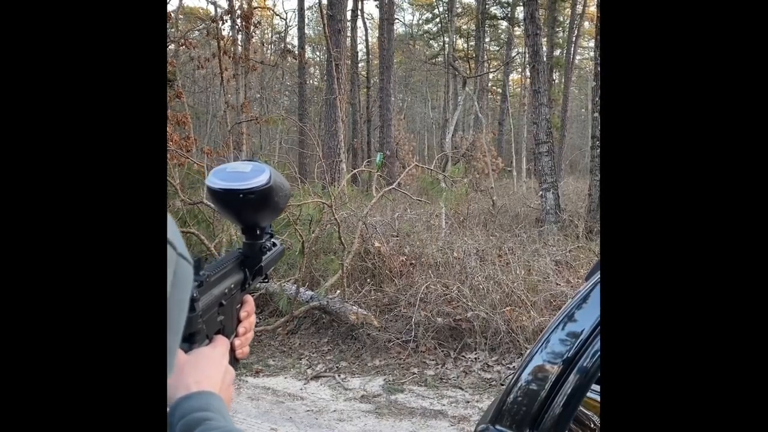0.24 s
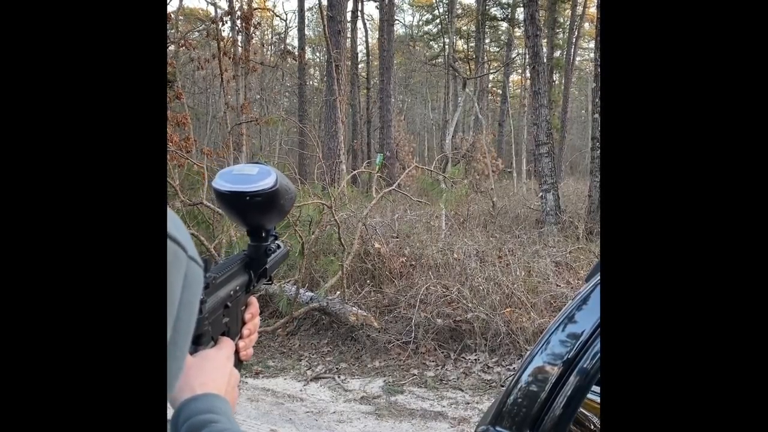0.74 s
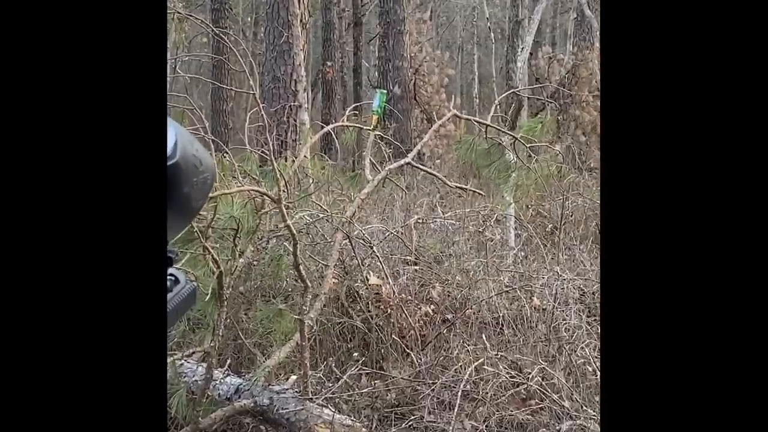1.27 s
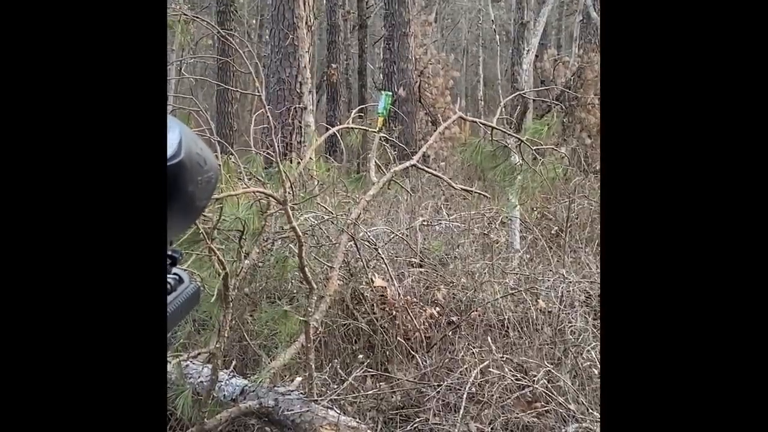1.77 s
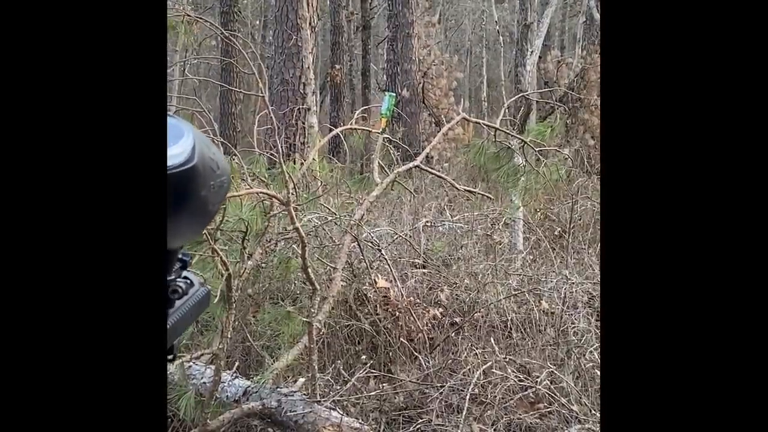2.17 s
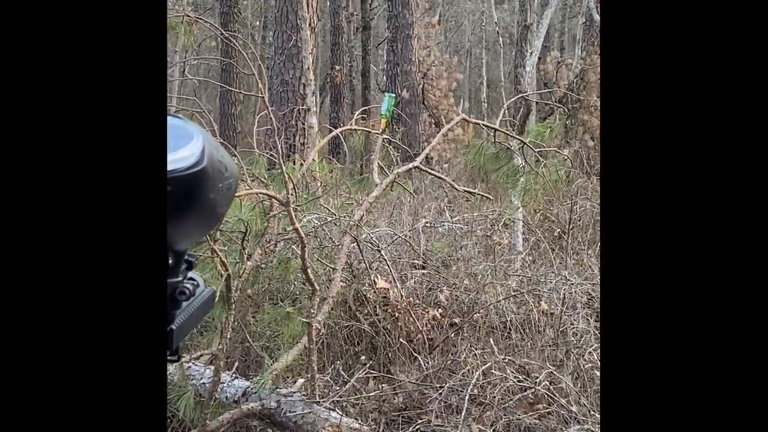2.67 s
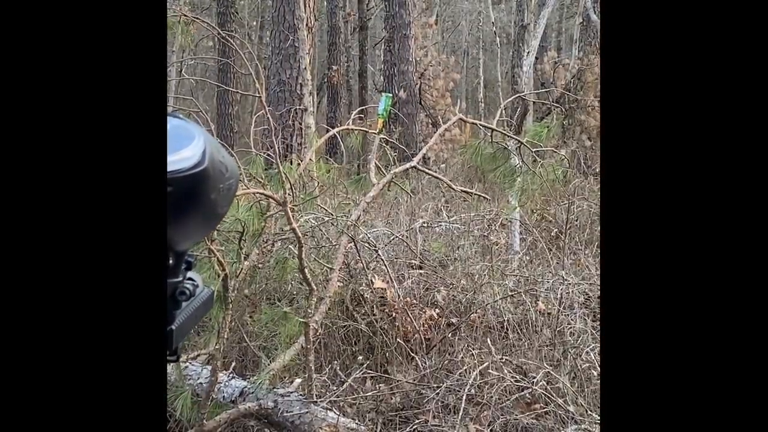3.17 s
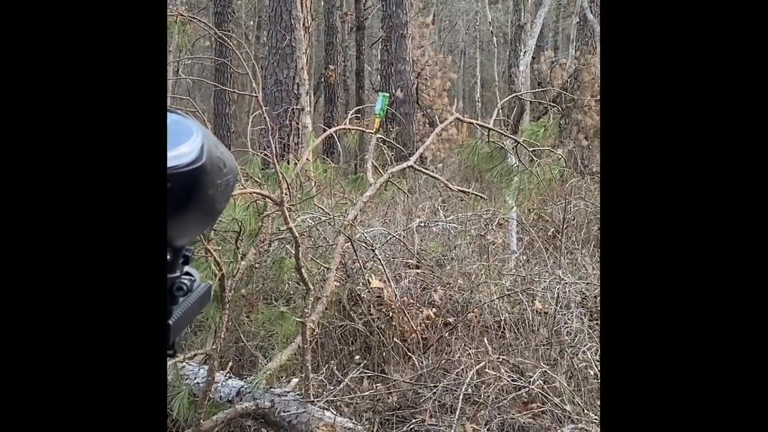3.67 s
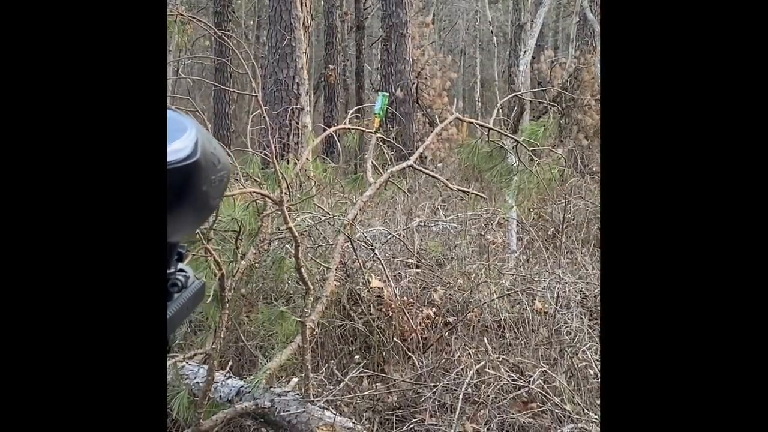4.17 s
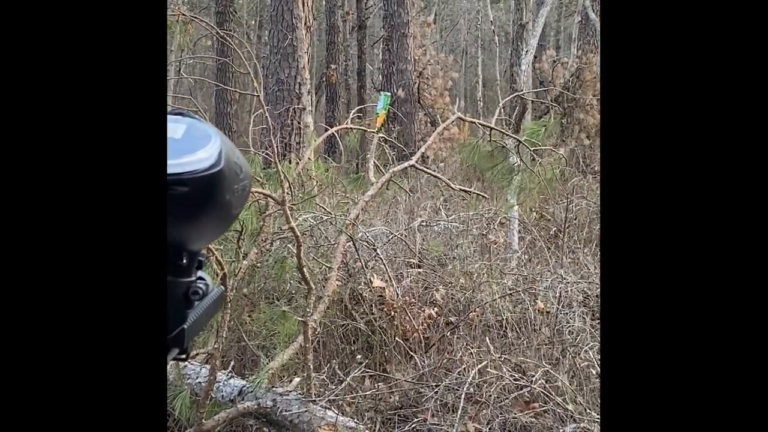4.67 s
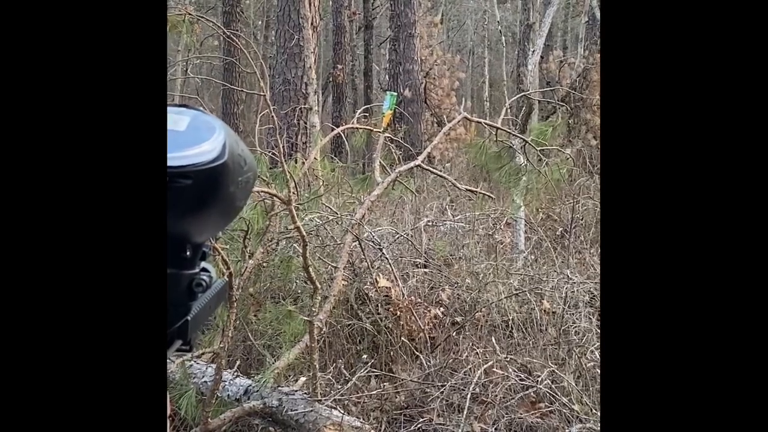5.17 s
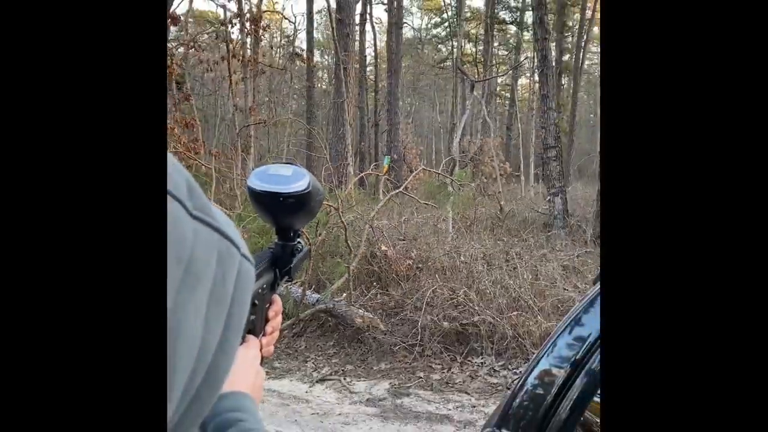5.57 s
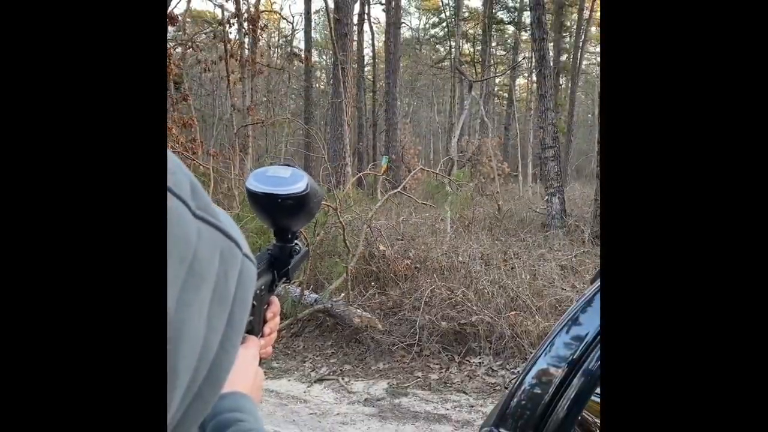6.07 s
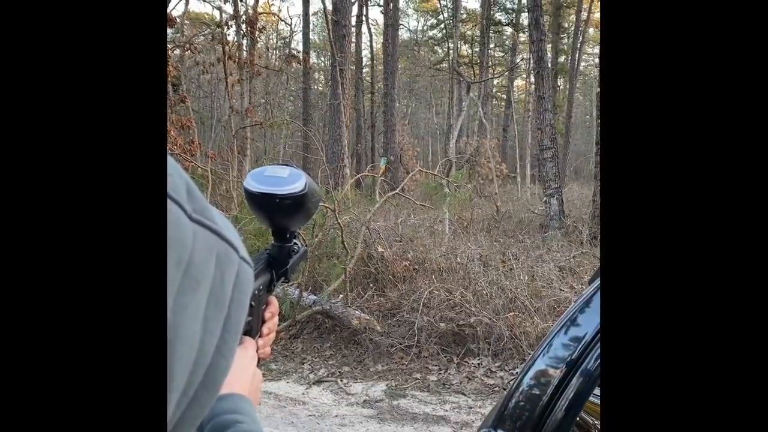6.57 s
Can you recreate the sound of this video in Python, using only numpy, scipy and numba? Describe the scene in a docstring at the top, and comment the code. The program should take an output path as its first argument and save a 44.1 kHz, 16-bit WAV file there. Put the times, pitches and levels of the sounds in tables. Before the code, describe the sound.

In a wood, a vehicle idles softly as a compressed-gas paintball gun cracks almost at once, close to the phone recording it. A ball splats on a bottle ahead with a bright ping. Two more pops bring only a faint tick and patters in the undergrowth, the next two make the bottle ring clearly, and a last shot ends it. The trunks return a brief echo each time, and the trigger clicks lightly in between.

```python
"""A vehicle's low idle is heard first, cut at once by the crack of a compressed-gas marker in a pine wood.
In each of six shots a sear clicks, a bolt slides, a striker lands and a gas pulse bounces in the barrel;
the muzzle thumps and hisses, and the trunks scatter an echo. Some balls excite the modes of a hanging
bottle farther ahead, scraps patter into the brush and the trigger clicks back. All is heard through the
two ports of a phone near the marker; its gain ducks at each bang."""
import sys
import numpy as np
from scipy import signal
from scipy.fft import rfft, irfft, next_fast_len
from scipy.io import wavfile
from scipy.ndimage import uniform_filter1d
from numba import njit

SR = 44100
rng = np.random.default_rng(int(sys.argv[2]) if len(sys.argv) > 2 else 0)


def wrap_up_sound(samples):
    """Save the sound to the file named by the first command line argument, as 16-bit audio."""
    columns = np.atleast_2d(samples).T
    # keep every value between -1 and 1, then stretch to whole-number steps
    tamed = np.clip(columns, -1, 1)
    steps = np.round(tamed * 32767).astype(np.int16)
    wavfile.write(sys.argv[1], SR, steps)


N = 300762


def undb(db):
    return 10 ** (np.asarray(db) / 20)

def level(x, db):
    return x * undb(db) / np.sqrt(np.mean(x ** 2))

def colour(x, points):
    """Spectral shaping by (frequency_hz, gain_db) points."""
    hz, db = np.transpose(points)
    f = np.arange(len(x) // 2 + 1) * SR / len(x)
    return irfft(rfft(x) * undb(np.interp(np.log(f + 1), np.log(hz), db)), len(x))

def noise(points, size):
    """Coloured Gaussian noise of unit RMS."""
    return level(colour(rng.standard_normal(size), points), 0)

def fade(t, t60):
    """Exponential decay: silent before 0, 60 dB down after t60."""
    return (t >= 0) * 1000. ** (-np.maximum(t, 0) / t60)

def ring(modes, t):
    """Superposition of damped modes struck at 0."""
    return sum(undb(db) * fade(t, t60) * np.sin(2 * np.pi * hz * t) for hz, db, t60 in modes)

def add(out, start_s, x):
    i = int(round(start_s * SR))
    out[i:i + len(x)] += x[:N - i]

def wander(rate_hz):
    """Smoothed random steps with a spread near 1."""
    hold = int(SR / rate_hz)
    steps = np.repeat(rng.standard_normal(N // hold + 1), hold)
    return 1.2 * uniform_filter1d(uniform_filter1d(steps, hold), hold)[:N]


# Hush of engine and wood: frequency_hz, relative_density_db
HUSH_SPECTRUM = [(22, -75), (32, -68), (50, -77.5), (100, -66.5), (200, -74), (300, -80.5), (450, -87),
                 (700, -90), (1000, -89), (1500, -96), (2500, -101), (4000, -109), (6500, -112),
                 (10000, -114), (16000, -121)]
def hush():
    """Amplitude modulation: broadband noise flickers slightly in level."""
    flicker_db = .6 * wander(3) + 1.2 * wander(25)
    return undb(-47.5 + flicker_db) * noise(HUSH_SPECTRUM, N)


# Exhaust response: frequency_hz, gain_db
EXHAUST_RESPONSE = [(22, -22.5), (36, -2.5), (52, -19), (72, 8.5), (107, -4), (143, -9), (215, -19.5),
                    (300, -29.5), (600, -69.5), (1500, -120)]
# Engine bay whines: pitch_hz, width_hz, level_db
ENGINE_WHINES = [(295.2, 20, -62.5), (589, 170, -66), (1210, 30, -71), (1866, 40, -79.5), (14340, 20, -105)]
def vehicle(firing_hz=34.78, hum_hz=1200):
    """Source and filter: uneven firings drive the exhaust, under narrowband whines and a wavering hum."""
    timing, strength = rng.standard_normal((300, 2)).T
    at = ((np.arange(300) + .038 * timing) * SR / firing_hz).astype(int)
    inside = (at >= 0) & (at < N)
    pulses = np.zeros(N)
    pulses[at[inside]] = undb(2.1 * strength[inside])
    out = level(colour(pulses - pulses.mean(), EXHAUST_RESPONSE), -44.5)
    for hz, width_hz, db in ENGINE_WHINES:
        out += level(noise([(hz - 2 * width_hz, -60), (hz, 0), (hz + 2 * width_hz, -60)], N), db)
    phase = 2 * np.pi * np.cumsum(hum_hz * (1 + .002 * wander(4.4))) / SR
    return out + level(np.sin(phase) * undb(2.3 * wander(9.6)), -68)


# Echo off the trunks: frequency_hz, relative_density_db
ECHO_SPECTRUM = [(150, -13), (400, -2.5), (800, -0.5), (1300, -2), (2000, -6), (2800, -10), (5200, -14),
                 (8000, -13), (13000, -12.5), (16500, -24.5)]
def tree_echo(t, low_t60_s=.83, treble_t60_s=.55):
    """Diffuse scattering: trunks return a noise tail whose treble dies sooner."""
    echo = noise(ECHO_SPECTRUM, len(t))
    low = signal.sosfilt(signal.butter(1, 2500, fs=SR, output="sos"), echo)
    tail = low * fade(t, low_t60_s) + (echo - low) * fade(t, treble_t60_s)
    return undb(-36.5) * tail * np.clip(t / .0063, 0, 1)


# Balls and scraps landing in the brush: start_s, level_db, pitch_hz
PATTERS = [(1.888, -29.5, 1014), (1.98, -38, 925), (2.018, -39.5, 1160), (2.754, -41, 912),
           (2.823, -37, 754), (4.348, -31, 611), (4.459, -52, 894), (4.508, -40, 1240)]
def brush():
    """Heavily damped impacts: each gives a dull burst of noise."""
    out, t = np.zeros(N), np.arange(4096) / SR
    for start_s, db, hz in PATTERS:
        patter = noise([(hz / 4, -14), (hz, 0), (hz * 3, -12), (hz * 8, -30)], len(t))
        add(out, start_s, undb(db) * patter * fade(t, .035))
    return out


# Trigger returns: start_s, level_db, second_click_gain_db
TRIGGER_CLICKS = [(0.1232, -51.5, -6), (0.455, -27, -1.5), (1.0194, -74, 20), (2.111, -27.5, -13.5),
                  (2.468, -51, -10), (2.941, -30.5, -5), (3.409, -47, -15), (4.5661, -29.5, 0),
                  (5.8468, -27.5, -4)]
# Click of trigger or sear: frequency_hz, relative_density_db
CLICK_SPECTRUM = [(150, -85), (400, -74.5), (800, -88.5), (1300, -79.5), (2000, -93.5), (2800, -82.5),
                  (4000, -81), (5200, -83.5), (6200, -79), (8000, -76.5), (10500, -71), (13000, -77.5),
                  (15000, -84), (16500, -98)]
def trigger(gap_s=.0056, t60_s=.017):
    """Contact transients: the trigger parts click twice in quick succession."""
    out, t = np.zeros(N), np.arange(4096) / SR
    for start_s, db, second_db in TRIGGER_CLICKS:
        twice = fade(t, t60_s) + undb(second_db) * fade(t - gap_s, t60_s)
        add(out, start_s, undb(db) * noise(CLICK_SPECTRUM, len(t)) * twice)
    return out


# Bottle resonances: pitch_hz, relative_db, first_t60_s, ringing_part
BOTTLE_MODES = [(3138, 0, .11, "wall"), (3203, 0, .45, "base"), (4718, -12, .25, "wall"),
                (5855, -8, .1, "wall"), (7230, -11, .07, "wall"), (8400, -17, .06, "wall"),
                (12650, -20, .05, "wall"), (14900, -16, .04, "wall"), (6190, 0, .18, "neck"),
                (9098, -5, .06, "neck"), (11500, -6, .1, "neck"), (13200, -18, .08, "neck"),
                (14420, -12, .08, "neck")]
def bottle_ring(t, swell_s, flutter_hz=300.4, **struck_db):
    """Two-stage modal decay: modes drop fast, then linger, fluttering roughly."""
    out = 0
    for hz, db, t60, part in BOTTLE_MODES:
        octaves = max(np.log2(hz / 3200), 0)
        db += struck_db[part] - 800 * octaves * swell_s  # a slow onset wakes high modes less
        flutter = np.interp(t, np.arange(400) / flutter_hz, rng.standard_normal(400))
        shake = min(.23 + .5 * octaves, 1) * flutter
        first = ring([(hz, db, t60)], t)
        linger = ring([(hz, db - 16.5, 1.06 / 2 ** (.46 * octaves))], t)
        out += (1 + shake) * first + (.45 + shake) * linger
    return out * np.minimum(t / swell_s, 1)


# Three ringing hits and one faint splat with a thin high tick; then the ring swells softly once more:
# start_s, splat_db, wall_db, base_db, neck_db, swell_s
SPLATS_AND_RINGS = [(0.277, -10.5, -49, -38, -22, .001), (1.9396, -26, -63, -66, -44, .001),
                    (4.3800, -9, -21, -32.5, -31, 0.00045), (5.642, -14.5, -18.5, -36, -35, .001),
                    (5.74, -68, -18, -59, -64, 0.02)]
def bottle():
    """Impact excitation: a ball bursts, its spray and echo hiss on, and the bottle rings."""
    out, t = np.zeros(N), np.arange(SR) / SR
    burst = fade(t, .022) + undb(-32.5) * fade(t, .4)
    for start_s, splat_db, wall_db, base_db, neck_db, swell_s in SPLATS_AND_RINGS:
        splat = noise([(200, -10), (800, -3), (2200, -6), (5000, 0), (16000, 0)], SR) * burst
        ringing = bottle_ring(t, swell_s, wall=wall_db, base=base_db, neck=neck_db)
        add(out, start_s, undb(splat_db) * splat + ringing)
    return out


SEAR_LEAD_S = .0188  # the sear releases this long before the striker blow
# Scrape of the bolt: frequency_hz, relative_density_db
SCRAPE_SPECTRUM = [(150, -86), (400, -73.5), (800, -75), (1300, -70), (2000, -76.5), (2800, -68.5),
                   (4000, -67.5), (5200, -72.5), (6200, -65), (8000, -86.5), (10500, -85), (13000, -88.5),
                   (15000, -89.5), (16500, -100.5)]
def bolt(t):
    """Sliding friction: freed with a click of the sear, the bolt scrapes louder as it gathers speed."""
    envelope = undb(-33 + 6 * np.minimum(t, 0) / SEAR_LEAD_S) * fade(np.maximum(t, 0), .013)
    scrape = envelope * noise(SCRAPE_SPECTRUM, len(t))
    sear = undb(-37) * fade(t + SEAR_LEAD_S, .012) * noise(CLICK_SPECTRUM, len(t))
    return scrape + sear


# Escaping gas: frequency_hz, relative_density_db
JET_SPECTRUM = [(150, 3), (400, -11.5), (800, -10.5), (1300, -2.5), (2000, -6.5), (2800, -1.5),
                (4000, -5.5), (6200, -13), (8000, -6.5), (13000, -11.5), (16500, -32)]
# Barrel resonances in the hiss: pitch_hz, width_hz, level_db, t60_s
BARREL_BANDS = [(3800, 800, -50.5, 0.55), (5970, 570, -45.5, .5)]
def gas_jet(t, leak_db, leak_s=.0065, hold_s=.0057):
    """Turbulent noise: gas leaks before the blow, bursts out, then hisses in the barrel's resonances."""
    leak = undb(leak_db) * (t < 0) * np.maximum(1 + t / leak_s, 0)
    burst = (t >= 0) * fade(np.maximum(t - hold_s, 0), .065)
    jet = undb(-10.5) * (leak + burst) * noise(JET_SPECTRUM, len(t))
    for hz, width, db, t60 in BARREL_BANDS:
        band = [(hz - 2 * width, -70), (hz - width, -30), (hz, 0),
                (hz + width, -30), (hz + 2 * width, -70)]
        jet += undb(db) * fade(t, t60) * noise(band, len(t))
    return jet

def striker(t):
    """A brief impact has a wide spectrum: the blow gives a bright crack."""
    return undb(-17.5) * fade(t, .004) * noise([(4500, -30), (9000, 0), (16500, 0)], len(t))


# Marker body resonances: pitch_hz, relative_db, t60_s
BODY_MODES = [(904, -11, 0.029), (1316.5, -13, 0.018), (1870, -13.5, 0.013), (2040, -17, 0.0049),
              (2680, -6, 0.0058), (3410, -13, 0.014), (6130, -14, 0.012)]
def barrel_knocks(t, build_db, round_trip_s=.0019, loss_db=5):
    """Repeated reflection: a gas pulse rings the body on each trip, most on the one freeing the ball."""
    trip = np.arange(9)
    trip_db = 2 - np.where(trip < 2, build_db * (2 - trip), loss_db * (trip - 2))
    recock = (.02, -13)  # the bolt knocks back: lag_s, level_db
    out = np.zeros(len(t))
    for lag_s, db in [*zip(.0002 + round_trip_s * trip, trip_db), recock]:
        modes = [(hz * (1 + .03 * rng.standard_normal()), gain, t60) for hz, gain, t60 in BODY_MODES]
        strength = undb(db + 1.5 * rng.standard_normal())
        lag_s += .0001 * rng.standard_normal()
        out[:4096] += strength * ring(modes, t[:4096] - lag_s)
    return out

def body_hum(t, pitch_hz=922):
    """Damped vibration: the body starts to hum just before the blow and hums on after it."""
    envelope = np.where(t < 0, fade(-t, .018), fade(t, .087))
    return undb(-17) * envelope * np.cos(2 * np.pi * pitch_hz * t)


# Air in barrel and breech: pitch_hz, relative_db, t60_s
CAVITY_MODES = [(75, -19, 0.017), (132, -4, 0.031), (330.2, -6.5, 0.038), (407, -8, 0.038)]
def muzzle_thump(t, delay_s=.0053, exit_s=.00098):
    """Cavity resonance: the enclosed air rings, swelling over the time the ball takes to leave."""
    push = np.hanning(int(exit_s * SR))
    thump = np.convolve(ring(CAVITY_MODES, t - delay_s), push / push.sum())[:len(t)]
    return signal.sosfilt(signal.butter(2, 55, "high", fs=SR, output="sos"), thump)


# Shots: blow_s, direct_gain_db, bolt_gain_db, echo_gain_db, build_db_per_trip, leak_gain_db
FIRING_CYCLES = [(0.1811, 0, 10, 2, 19.5, -7.5), (1.8414, 1, 1, 3.5, 3.5, -26.5), (2.6564, 2, 2, 3, 6, -27),
                 (4.2802, 2.5, 1, 3.5, 4, -21), (5.5445, -0.5, 9, 1.5, 2.5, -5.5),
                 (6.803, -0.5, 8, -3, 3.5, -4)]
def marker():
    """Superposition: each shot sums its parts around the blow at t = 0; the echo is returned apart."""
    direct, echoes = np.zeros(N), np.zeros(N)
    t = np.arange(32768) / SR - SEAR_LEAD_S
    thump = muzzle_thump(t) + body_hum(t)
    for blow_s, db, bolt_db, echo_db, build_db, leak_db in FIRING_CYCLES:
        shot = thump + barrel_knocks(t, build_db) + gas_jet(t, leak_db) + striker(t)
        shot += undb(bolt_db) * bolt(t)
        add(direct, blow_s - SEAR_LEAD_S, undb(db) * shot)
        add(echoes, blow_s - SEAR_LEAD_S, undb(echo_db) * tree_echo(t))
    return direct, echoes


# Port level difference for the marker, and for all else: frequency_hz, left_minus_right_db
MARKER_BALANCE = [(60, 0), (200, .5), (380, 3.5), (700, 10), (1290, 7.5), (2380, .5), (4400, 0)]
FIELD_BALANCE = [(60, 0), (200, 1), (380, 2.5), (700, 6), (1290, 4.5), (2380, 0)]
# Phase lead of the left port: frequency_hz, wide_rad, zoomed_rad
LEFT_LEAD = [(0, 0, 0), (2300, .8, .6), (2900, 2.4, .6), (4100, 3.6, .6), (5500, 3.8, 1.9),
             (7600, 2.6, 2.8), (11500, 3.4, 3.4), (16400, 6.1, 6.1)]
# Phase spread of sound from all round: frequency_hz, wide_rad, zoomed_rad
PHASE_SPREAD = [(202, 0, 0.0075), (624, 1.05, 1), (1800, 1, .6), (2550, 6, 0.12), (6500, 4.5, 1),
                (7100, -0.65, 0.13), (16000, 2, 0.062)]
# Wide pickup relative to zoomed: frequency_hz, gain_db
WIDE_RESPONSE = [(100, 0), (300, 1.5), (1000, 0), (3000, 4), (6000, 2), (12000, -1.5)]
def ports(x, balance, wide_left_db=0, diffuse=0, zoom_in_s=.9, zoom_out_s=5.2, glide_s=.25):
    """Spaced-pair stereo: two ports differ in level and phase, mixed otherwise as the phone zooms in."""
    size = next_fast_len(N + SR // 10)
    f, t = np.arange(size // 2 + 1) * SR / size, np.arange(N) / SR
    hz, db = np.transpose(balance)
    balance_db = np.interp(np.log(f + 1), np.log(hz), db)
    scatter = diffuse * np.interp(f, np.arange(800) * 30, rng.standard_normal(800))
    zoom = np.clip(.5 + np.minimum(t - zoom_in_s, zoom_out_s - t) / glide_s, 0, 1)
    wide, zoomed = (1, 1 - zoom, colour(x, WIDE_RESPONSE), wide_left_db), (2, zoom, x, 0)
    lead, spread = np.transpose(LEFT_LEAD), np.transpose(PHASE_SPREAD)
    out = 0
    for column, share, heard, left_db in (wide, zoomed):
        phase = np.interp(f, lead[0], lead[column]) + scatter * np.interp(f, spread[0], spread[column])
        left = undb((balance_db + left_db) / 2) * np.exp(.5j * phase)
        out += share * irfft(rfft(heard, size) * np.array([left, 1 / left]), size)[:, :N]
    return out

def scene():
    """Direct and diffuse fields add at the phone's ports."""
    shots, echoes = marker()
    near = ports(shots, MARKER_BALANCE, wide_left_db=2.1)
    ahead = ports(bottle() + brush() + trigger(), FIELD_BALANCE)
    around = ports(echoes + vehicle() + hush(), FIELD_BALANCE, diffuse=.94)
    return near + ahead + around

@njit
def follow(x, attack_s, release_s):
    """Envelope detection with separate time constants for rise and fall."""
    out, envelope = np.empty(len(x)), 0.
    for i in range(len(x)):
        envelope += (x[i] - envelope) / (SR * (attack_s if x[i] > envelope else release_s))
        out[i] = envelope
    return out

def record(dry):
    """Automatic gain control: bangs lower the gain for good and duck it briefly; peaks are rounded."""
    rectified = np.abs(dry).mean(axis=0)
    held = follow(rectified, .0068, np.inf)
    recent = follow(rectified, .012, .051)
    gain = undb(6.6 * np.clip(1 - held / .29, 0, 1)) * (1 + recent / .0045) ** -.22
    lowpass = signal.ellip(12, .2, 70, 16700, fs=SR, output="sos")
    return signal.sosfilt(lowpass, .95 * np.tanh(1.496 * gain * dry))


dry = scene()
out = record(dry)
wrap_up_sound(out)
```